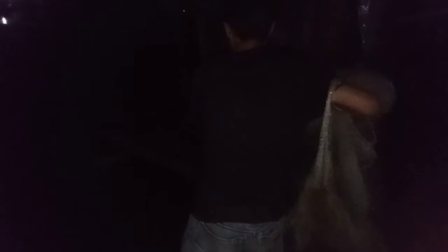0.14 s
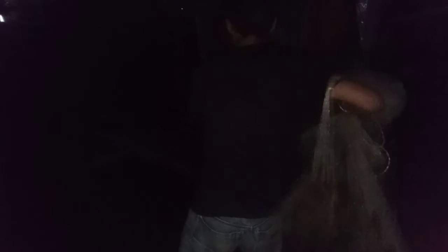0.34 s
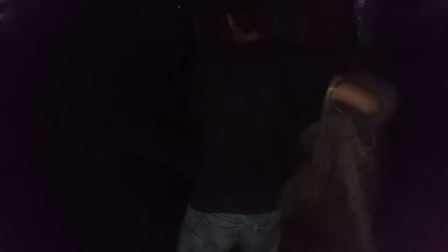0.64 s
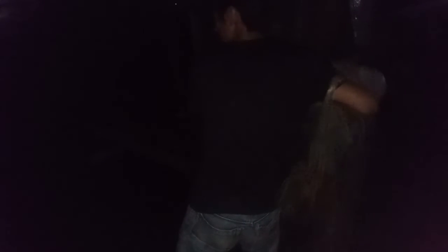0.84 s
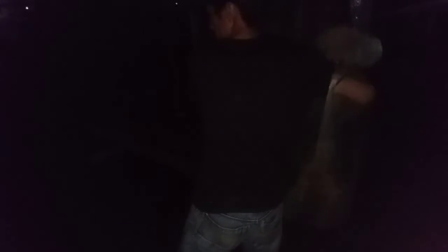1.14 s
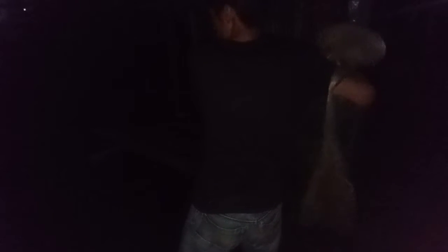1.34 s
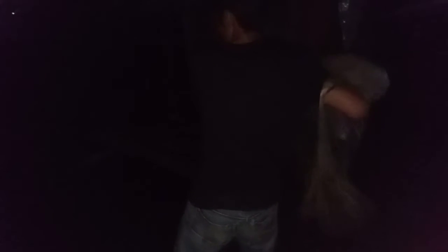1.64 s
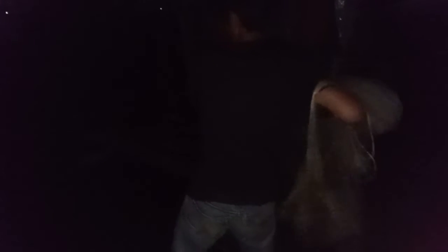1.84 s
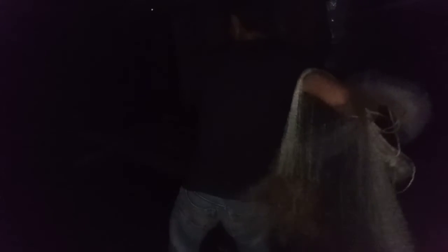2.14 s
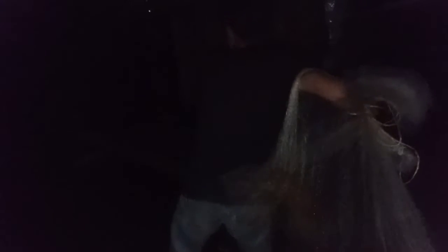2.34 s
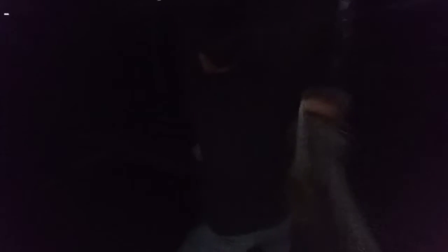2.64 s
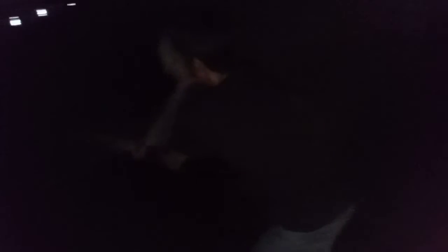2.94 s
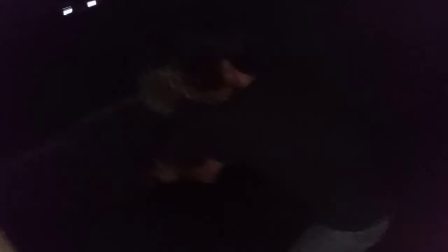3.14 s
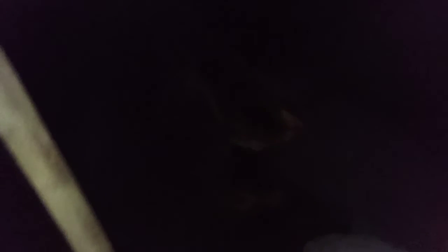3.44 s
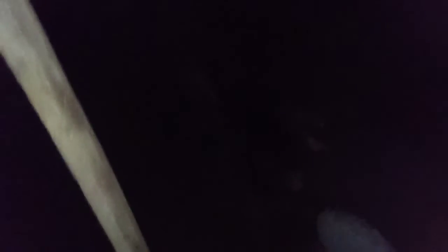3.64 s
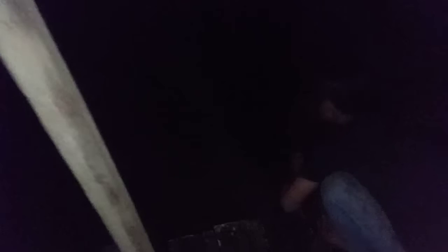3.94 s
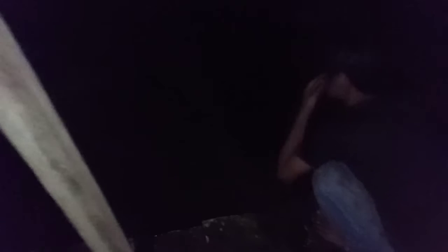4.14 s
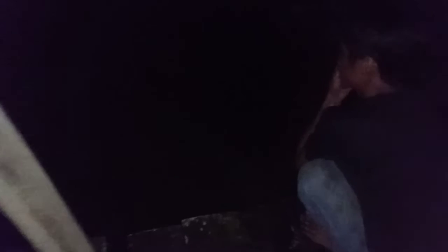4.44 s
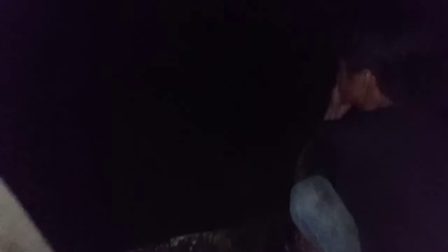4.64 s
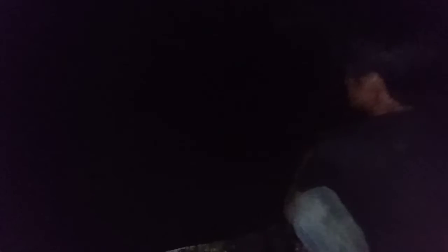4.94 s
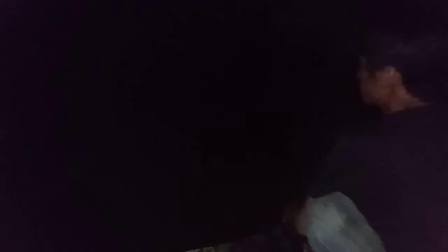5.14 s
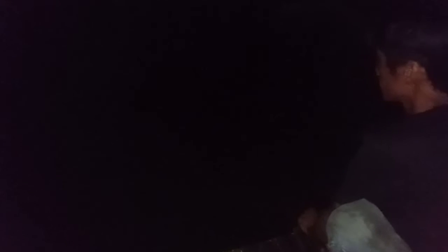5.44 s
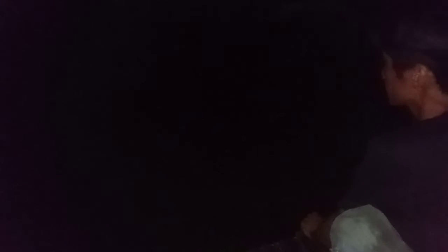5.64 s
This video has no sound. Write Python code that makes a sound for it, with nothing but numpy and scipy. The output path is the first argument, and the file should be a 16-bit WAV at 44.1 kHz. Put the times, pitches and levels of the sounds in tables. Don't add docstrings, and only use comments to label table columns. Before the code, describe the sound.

A quiet river at night, heard from a boat through a small microphone: soft hiss, a far engine's fluttering low hum and a cricket's high, pulsed chirps in quick groups of two to four, with some gaps. From 0 to 2.6 s, small sinker links clink irregularly, bright and thin, busiest in the first half second, with light mesh rustle. From 2.65 s the net swings and the rattle thickens. A faint line whistle at 3.0 s leads to a sharp snap at 3.1, then another rising whistle at 3.3. A foot slides and thumps hollowly at 3.5. At 3.8 the net meets the water: sharp slaps, dense bubbles and spray spread until 4.4, with loud plops near 3.9 and 4.3. The splash collapses fast into drips, then tiny droplet ticks to the end. The cricket is duller after 4.4; a faint, rough frog croaks at 5.45-5.75.

```python
import sys
import numpy as np
from scipy import signal
from scipy.fft import rfft, irfft
from scipy.io import wavfile
from scipy.ndimage import uniform_filter1d

SR = 44100
rng = np.random.default_rng(int(sys.argv[2]) if len(sys.argv) > 2 else 0)


def inscribe(sig):
    pcm = np.round(np.clip(np.atleast_2d(sig).T, -1, 1) * 32767)
    wavfile.write(sys.argv[1], SR, pcm.astype(np.int16))


def magnitude_from_level(level_db):
    exponent = np.asarray(level_db, float) / 20
    return 10 ** exponent


N = 254898

# (time [s], peak level [dB], high ring [Hz], high ring over the low [dB])
HANGING_KNOCKS = [(0.041, -49.5, 12300, 11.5), (0.0655, -55, 12700, 10), (0.1037, -43, 13000, 6),
                  (0.1238, -41.5, 12700, 13.5), (0.167, -39.5, 12200, 0), (0.214, -33.5, 12600, -2),
                  (0.2485, -40, 12100, 9.5), (0.309, -33.5, 12100, 6), (0.316, -27, 12300, 7),
                  (0.344, -39, 12600, 1), (0.375, -39.5, 12500, 0), (0.4339, -55, 12700, 15),
                  (0.461, -42.5, 12420, 7), (0.6456, -38.5, 12500, -14), (0.7645, -36, 12200, -15),
                  (0.8056, -46, 12180, 7), (0.9213, -49, 12700, -11), (1.1174, -52, 12300, 7),
                  (1.1973, -41, 12400, -2), (1.2645, -52.5, 12800, 16), (1.5878, -45, 11800, -4),
                  (1.649, -40.5, 12180, 2), (1.8398, -39, 11400, -13), (1.888, -34, 12300, -15),
                  (1.9909, -54, 12600, 0), (2.0637, -57, 12500, 12), (2.169, -38, 12740, 9.5),
                  (2.2, -42, 12670, 5), (2.2653, -45, 12300, -7), (2.3042, -56, 12600, 0),
                  (2.331, -56, 11900, 6), (2.402, -45, 12800, 5), (2.410, -43, 12800, -11),
                  (2.4355, -48, 11900, -2), (2.4455, -36.5, 12500, 8.5), (2.557, -55, 12200, 5),
                  (2.5853, -43, 13400, -6)]
# (time [s], level [dB])
NET_LANDING = [
    (3.795, -38.5),
    (3.81, -34.5),
    (3.843, -35.5),
    (3.847, -33),
    (3.918, -27),
    (3.962, -30.5),
    (4.058, -30),
    (4.064, -33),
    (4.424, -34),
]


def evened(x):
    return x / np.sqrt(np.mean(x ** 2) + 1e-20)


def settled(x, first):
    return x / np.std(x[first:])


def add(mix, s, sound):
    part = mix[round(s * SR):][:len(sound)]
    part += sound[:len(part)]


def curves(rows):
    s, *columns = np.transpose(rows)
    return [np.interp(np.arange(N) / SR, s, c, left=-90, right=-90) for c in columns]


def coloured(x, points, lo_hz=0, hi_hz=30000):
    hz = np.fft.rfftfreq(N, 1 / SR) + 1
    f, db = np.transpose(points)
    edges = 1 / np.sqrt((1 + (lo_hz / hz) ** 8) * (1 + (hz / hi_hz) ** 8))
    return irfft(rfft(x) * magnitude_from_level(np.interp(np.log(hz), np.log(f), db)) * edges, N)


def wander(per_s):
    noise = uniform_filter1d(rng.standard_normal(N), int(SR / per_s / 4) + 1)
    return evened(signal.lfilter([1], [1, -np.exp(-2 * np.pi * per_s / SR)], noise))


def clicks(per_s, spread_db):
    where, size, sign = rng.random((int(per_s * N / SR), 3)).T
    size_db = spread_db * np.minimum(-np.log(size + 1e-9), 5)
    return np.bincount((where * N).astype(int), magnitude_from_level(size_db) * np.sign(sign - .5), N)


def ring(hz, t60, glide=0.):
    t = np.arange(int(t60 * SR) + 8) / SR
    return magnitude_from_level(-60 * t / t60) * np.sin(2 * np.pi * hz * t * (1 + glide * t / t60))


def ramped(mode, rise_s):
    return mode * np.minimum(np.arange(len(mode)) / SR / rise_s, 1)


def fuzzy_tone(hz, fuzz):
    return (fuzz * np.exp(2j * np.pi * np.cumsum(hz) / SR)).real


def night():
    # (pitch [Hz], level [dB per Hz])
    night_colour = [(24, -51), (40, -34), (130, -8.5), (171, -9), (936, -28.5), (3110, -29.5), (4680, -39),
                    (5260, -30), (5670, -34), (6270, -28.5), (7470, -43), (8460, -33), (9590, -48),
                    (12300, -47), (15800, -54.5)]
    hiss = coloured(rng.standard_normal(N), night_colour, lo_hz=55.0)
    hiss /= np.std(coloured(hiss, [(1, 0), (2, 0)], 500, 4000))
    return magnitude_from_level(-61 + 0.5 * wander(0.67)) * hiss


def engine():
    # (time [s], main firing tone [dB], load [0-1])
    engine_run = [(0.0, -51, 0.14), (0.21, -50, 0.58), (0.4, -67, 0.42), (0.69, -49, 0.66),
                  (1.19, -49.5, 1.0), (1.5, -46.5, 0.7), (1.77, -45.5, 0.75), (1.95, -51.5, 0),
                  (2.11, -58, 0.4), (2.28, -50, 0.1), (3.35, -49, 0.39), (3.98, -46, 0.52),
                  (4.81, -46.5, 0), (5.78, -47, 0)]
    # (multiple of the shaft speed, level [dB])
    shaft_orders = [(3, -22), (7, -27), (8, -9), (9, 1), (10, -3), (12, -20), (13, -10), (14, -14),
                    (15, -19.5), (16, -14)]
    # (pitch [Hz], level [dB per Hz])
    rumble_colour = [(26, -36), (45, -2), (118, -2), (145, -4.5), (217, -6), (276, -8), (351, -11.5),
                     (700, -51), (910, -46), (1540, -120)]
    shaft_hz, pipe_lag_s, load_lift_db = 30.42, 0.27, 15.5
    t = np.arange(N) / SR
    line_db, load = curves(engine_run)
    late = np.interp(t - pipe_lag_s, t, load)
    orders_db = -61 + load_lift_db * load
    pipe_db = -56.5 + 7 * late
    shift_db = load_lift_db * (late - load)
    turns = 2 * np.pi * np.cumsum(shaft_hz * (1 + 0.0035 * wander(2.97))) / SR
    main = np.sqrt(2) * magnitude_from_level(line_db - .3 + 1.7 * wander(16)) * np.cos(4 * turns)
    pipe = magnitude_from_level(pipe_db + 1.5 * wander(6)) * (np.cos(5 * turns + 1) + .6 * np.cos(6 * turns + 3))
    orders = np.zeros(N)
    for k, db in shaft_orders:
        level = magnitude_from_level(db + shift_db * (k > 11) + 2.3 * wander(7.9))
        orders += level * np.cos(k * turns + 6 * rng.random())
    second_motor = np.sqrt(2) * magnitude_from_level(-60.5 + 0.62 * wander(3.7)) * np.cos(2 * np.pi * 69.5 * t)
    rumble = evened(coloured(rng.standard_normal(N), rumble_colour, lo_hz=59.5, hi_hz=900))
    return main + magnitude_from_level(-0.5) * pipe + magnitude_from_level(orders_db - 2.0) * orders + second_motor + magnitude_from_level(-55.5) * rumble


def strokes():
    # (start [s], level [dB])
    triples = [(0.0315, -54), (0.1965, -54), (0.371, -54), (0.8696, -54), (1.039, -55), (1.2, -55.5),
               (1.3596, -55.5), (1.52, -53.5), (1.689, -54), (1.8587, -55.5), (2.028, -52.5), (2.9196, -56),
               (3.2155, -53.5), (3.3859, -52.5), (3.5594, -50), (4.44, -57), (4.601, -57), (4.763, -58),
               (4.934, -55), (5.097, -55.5), (5.265, -58), (5.429, -59)]
    # (start [s], level [dB])
    doubles = [(2.4235, -53), (2.537, -52.5), (2.6665, -52), (2.7833, -53), (3.0827, -55), (3.7458, -55),
               (5.615, -58.5), (5.733, -58.5)]
    # (start [s], level [dB])
    slow_runs = [
        (0.557, -53),
        (2.1766, -49.5),
    ]
    # (start [s], level [dB])
    lone = [
        (0.8125, -53),
        (5.53, -69),
    ]
    gap_s, last_gap_s, slow_gap_s, second_db = .0325, .0388, .065, 0.5
    kinds = [(triples, [0, gap_s, gap_s + last_gap_s], [0, second_db, 0]),
             (doubles, [0, gap_s], [0, second_db]),
             (lone, [0], [0]),
             (slow_runs, slow_gap_s * np.arange(4), np.zeros(4))]
    return [(s + late, db + step) for rows, lates, steps in kinds
            for s, db in rows for late, step in zip(lates, steps)]


def cricket():
    turned_s = 4.4
    t, out = np.arange(int(.033 * SR)) / SR, np.zeros(N)
    shape = np.minimum(t / .006, 1) * np.minimum((t[-1] - t) / .004, 1)
    all_strokes = strokes()
    for (s, db), (a, b, c) in zip(all_strokes, rng.standard_normal((len(all_strokes), 3))):
        turned = s > turned_s
        fall_hz = (570 - 90 * turned) * (t / t[-1]) ** (2.5 + .3 * c)
        hz = (5420 - 70 * turned - fall_hz) * (1 + .003 * a)
        level = magnitude_from_level(db + 5.0 - 330 * t + 0.64 * c)
        add(out, s - .0035, level * shape * np.sin(2 * np.pi * np.cumsum(hz) / SR + 3 * b))
    echo = np.zeros(int(.0068 * SR) + 1)
    echo[0], echo[-1] = 1, .35
    bank = np.arange(int(.12 * SR)) / SR
    reeds = rng.standard_normal(len(bank)) * magnitude_from_level(-60 * bank / .25) * (bank > .01)
    scattered = out * magnitude_from_level(np.where(np.arange(N) / SR > turned_s, -28.5, -34.5))
    return signal.oaconvolve(out, echo)[:N] + signal.oaconvolve(scattered, reeds)[:N]


def chain_knocks():
    # (time [s], peak level [dB], high ring [Hz], high ring over the low [dB])
    swung_knocks = [(2.633, -32.5, 12000, -7), (2.6738, -35, 12600, 0), (2.7071, -44, 11960, 14),
                    (2.7541, -40, 11900, 2), (2.8092, -37.5, 12600, 4), (2.8534, -38.5, 11900, 2),
                    (2.9148, -35, 11800, 3.5), (2.9535, -35, 12400, 5), (3.0947, -38, 12000, 11),
                    (3.169, -33, 11400, -1), (3.275, -33, 12300, -6), (3.561, -33, 12400, -6),
                    (3.576, -33, 12200, -3), (3.614, -34, 12600, 1), (3.6895, -29.5, 12000, -6)]
    # (time [s], peak level [dB], high ring [Hz], high
    # ring over the low [dB])
    low_knocks = [
        (3.190, -31, 11600, -8),
        (3.238, -37, 11700, -6),
        (3.629, -31, 11900, -5),
        (3.653, -33, 11800, -7),
        (3.677, -36, 11900, -8),
        (3.722, -37, 11800, -6),
        (3.750, -36, 12000, -6),
    ]
    kinds = [(8420, HANGING_KNOCKS), (8160, swung_knocks), (7850, low_knocks)]
    knocks = [(low_hz, *row) for low_hz, rows in kinds for row in rows]
    out, rise_s = np.zeros(N), 0.00071
    for (low_hz, s, db, high_hz, high_db), chance in zip(knocks, rng.uniform(-1.3, 1, (len(knocks), 4, 3))):
        low_hz *= 1 + 0.0128 * chance[0, 1]
        for k, (late, size, loud) in enumerate(chance):
            at = s + 0.006 * k * (1 + 0.31 * late)
            hit_db = db - 5.4 * k + 2.4 * loud * (k > 0)
            low = ramped(ring(low_hz * (1 + 0.0044 * k * size), 0.074), rise_s)
            high = ramped(ring(high_hz * (1 + 0.0128 * k * size), 0.07), rise_s)
            add(out, at, magnitude_from_level(hit_db - 12.0) * low)
            add(out, at, magnitude_from_level(hit_db - 14.5 + high_db) * high)
            add(out, at, magnitude_from_level(hit_db - 24.5 - .5 * high_db) * ring(low_hz * (.42 + .06 * size), 0.023))
            add(out, at, magnitude_from_level(hit_db - 16) * ring(11000 * (1 + 0.22 * size), .0015))
    return out


def shaking():
    # (time [s], rattle level [dB])
    swing = [
        (1.5, -77.5),
        (1.65, -62.5),
        (1.8, -72),
        (2.5, -82.5),
        (2.68, -56),
        (3.15, -53),
        (3.22, -47.5),
        (3.52, -53.5),
        (3.8, -53),
    ]
    t = np.arange(N) / SR
    swing_db = curves(swing)[0]
    links, mesh = magnitude_from_level(swing_db), np.zeros(N)
    for s, db, _, high_db in HANGING_KNOCKS:
        at = slice(round((s - .03) * SR), round((s + .25) * SR))
        u = t[at] - s
        fade = magnitude_from_level(db - 20 - 319 * np.maximum(u, 0))
        shiver = fade * np.exp(np.minimum(u, 0) / 0.0029)
        links[at] += shiver
        mesh[at] += shiver * magnitude_from_level(-15 + 0.67 * high_db)
    return links, mesh, magnitude_from_level(swing_db - 14.5)


def chain_rattle():
    # (pitch [Hz], level [dB])
    mesh_colour = [(1500, 0), (2200, 4), (3800, -1.5), (4600, -35), (6000, 3.5), (8300, 5.5), (10200, -7.5),
                   (12200, 5.5), (13800, -1), (15500, -2.5)]
    rattle, shiver, rustle = shaking()
    links, link_t60 = np.zeros(N), 0.06
    for size, other in zip(np.linspace(-1, 1, 16), rng.permutation(np.linspace(-1, 1, 16))):
        link = ring(8150 * (1 + 0.044 * size), link_t60)
        link = link + magnitude_from_level(-8.5) * np.resize(ring(3800 * (1 + 0.0675 * size), link_t60), len(link))
        link = link + magnitude_from_level(-5.5) * np.resize(ring(12200 * (1 + 0.0487 * other), link_t60), len(link))
        links += signal.oaconvolve(clicks(75, 3.76) * rattle, link / 12)[:N]
    mesh = evened(coloured(clicks(3500, 2.1), mesh_colour, lo_hz=1190))
    bright_mesh = coloured(mesh, [(1, 0), (2, 0)], lo_hz=4340)
    return magnitude_from_level(6.0) * links + magnitude_from_level(2.0 * wander(60) + 11.5) * (rustle * mesh + shiver * bright_mesh)


def tinkle():
    t, out = np.arange(N) / SR, np.zeros(N)
    for hz in np.linspace(11500, 13400, 8):
        ping = ring(hz, .03)
        ping *= np.minimum(np.arange(len(ping)) / 50, 1)
        out += signal.oaconvolve(clicks(6, 2.8) * (t < 3.79), ping)[:N]
    return magnitude_from_level(-70) * out


def hand_line():
    # (time [s], level [dB], pitch [Hz])
    line_runs = [
        [(2.955, -78, 2090), (2.98, -63, 2110), (3.03, -67.5, 2130), (3.06, -78, 2280)],
        [(3.295, -78, 1870), (3.31, -65, 1930), (3.364, -62, 2170), (3.41, -76, 2200)],
    ]
    fuzz = wander(30) + 1j * wander(30)
    return sum(magnitude_from_level(db) * fuzzy_tone(hz, fuzz) for db, hz in map(curves, line_runs))


def line_snap():
    # (pitch [Hz], level [dB], time to die by 60 dB [s])
    snap_rings = [(2250, -27, .014), (2700, -34, .008), (3100, -26, .016), (3650, -30, .008),
                  (6000, -38, .01), (1750, -34, .01)]
    out, snap_s = np.zeros(N), 3.10713
    u = np.arange(-80, 80) / SR
    crack = np.exp(-(u / .00029) ** 2) * np.sin(2 * np.pi * 2850 * u)
    add(out, snap_s - 80 / SR, magnitude_from_level(-13) * crack)
    for hz, db, t60 in snap_rings:
        add(out, snap_s, magnitude_from_level(db) * ramped(ring(hz, t60), .0006))
    return out


def drops():
    # (time [s], peak level [dB], pitch [Hz], length [cycles])
    main_drops = [(3.916, -13.5, 2110, 4.8), (4.1106, -20, 6800, 9), (4.162, -19, 7000, 6.7),
                  (4.207, -20, 2040, 6), (4.236, -17.5, 6900, 4.7), (4.234, -36.5, 335.7, 4.9),
                  (4.2969, -12, 1370, 3.1), (4.3013, -19, 2400, 2.6), (4.305, -16.5, 2160, 4),
                  (4.399, -16.5, 900, 1.6), (4.4185, -20.5, 4680, 5.1), (4.427, -31.5, 5900, 23),
                  (4.455, -26, 8000, 5), (4.695, -38.5, 6800, 9.1), (4.727, -34.5, 2560, 3.8),
                  (4.734, -38.5, 760, 4), (4.77, -36.5, 2500, 4.8), (4.788, -37, 3280, 7),
                  (4.82, -44, 2350, 5.1), (4.878, -37, 2860, 2.2), (5.105, -37, 2260, 1.7),
                  (5.231, -43, 6250, 6.1), (5.244, -45, 2600, 3.1), (5.4, -45.5, 1900, 3.8),
                  (5.619, -48, 1440, 4.5)]
    # (time [s], peak level [dB], pitch [Hz], length [cycles])
    more_drops = [(3.116, -44.5, 1010, 4), (4.2268, -23, 6980, 4), (4.209, -28, 13800, 6),
                  (4.3086, -21, 6210, 4), (4.354, -24, 5080, 4.4), (4.367, -30, 13500, 5),
                  (4.413, -27, 12520, 5), (4.47, -34, 2300, 8), (4.484, -35, 2300, 8),
                  (4.512, -33, 1850, 4), (4.532, -37, 7000, 5), (4.557, -33, 5250, 5),
                  (4.573, -39, 5500, 3), (4.581, -37, 2080, 4), (4.591, -35, 2320, 6.3),
                  (4.5975, -37, 5860, 5), (4.6109, -37, 7000, 4), (4.6563, -39, 8400, 5),
                  (4.801, -45, 6910, 5)]
    out = np.zeros(N)
    for s, db, hz, cycles in main_drops + more_drops:
        bubble = ring(hz, 4 * max(cycles, 1) / hz, glide=.1)
        add(out, s, magnitude_from_level(db + 4) * ramped(bubble, 1.2 / hz))
    return out


def footfall():
    # (time [s], level [dB], start pitch [Hz], end pitch [Hz], time to die by 60 dB [s])
    thumps = [
        (3.513, -26, 243, 187, 0.11),
        (3.533, -33.5, 105, 102, 0.17),
    ]
    # (time [s], level [dB])
    scuff = [
        (3.42, -66),
        (3.47, -55.5),
        (3.53, -53),
        (3.6, -55),
        (3.72, -67),
    ]
    out = np.zeros(N)
    for s, db, start_hz, end_hz, t60 in thumps:
        add(out, s, magnitude_from_level(db) * ramped(ring(start_hz, t60, glide=end_hz / start_hz - 1), 0.0034))
    grit = coloured(clicks(1500, 2.3), [(500, 5.0), (1300, -5.5), (2800, -0.5)], 300, 2640)
    return out + magnitude_from_level(curves(scuff)[0]) * evened(grit)


def water_levels():
    # (while landing [dB], change [dB per s], while settling [dB],
    # last fizz [dB], fade of the fizz [dB per s])
    gurgle = (-17.5, 16.5, -6, -79, -4)
    body = (0, 0.5, 0.5, -79.5, 15)
    spray = (-9, -3, -21, -57.5, 9.5)
    mist = (-12.5, -8.5, -24, -61.5, 13)
    # (start level [dB], fall [dB per s])
    settle = [(-43.5, 72), (-44, 40)]
    # (time [s], lift [dB], fall [s])
    spray_sheets = [
        (3.797, 12.5, 0.045),
        (3.845, 11.5, 0.045),
        (3.875, 2, 0.014),
    ]
    t, start, end = np.arange(N) / SR, NET_LANDING[0][0], NET_LANDING[-1][0]
    settling = sum(magnitude_from_level(db - fall * np.maximum(t - end, 0)) for db, fall in settle)
    plunge = 9.3 * np.clip((t - 3.846) / 0.022, 0, 1) * (t < 4.113) - 25 * (t < 3.842)
    sheets = sum(db * np.exp(-np.maximum(t - s, 0) / fall) * (t > s) for s, db, fall in spray_sheets)
    landing_db = curves(NET_LANDING)[0]
    levels = []
    for part, lift in [(gurgle, plunge), (body, 0), (spray, sheets), (mist, 0.22 * sheets)]:
        share, change, late, fizz, fade = part
        landing_part = landing_db + share + change * (t - start) + lift
        settling_part = 20 * np.log10(settling * magnitude_from_level(late) + magnitude_from_level(fizz - fade * (t - end)))
        levels.append(np.where(t < end, landing_part, settling_part))
    return levels


def patchy(x, spread_db):
    z = signal.stft(x, nperseg=512)[2]
    field = uniform_filter1d(rng.standard_normal(z.shape), size=6, axis=0)
    field = uniform_filter1d(field, size=4, axis=1)
    spread_db = spread_db + .5 * (np.arange(z.shape[1]) * 256 / SR > NET_LANDING[-1][0])
    gain = magnitude_from_level(spread_db * evened(field) - .1 * spread_db ** 2)
    return signal.istft(z * gain, nperseg=512)[1][:N]


def splash():
    # (pitch [Hz], level [dB per Hz])
    water_colour = [(150, -27), (250, -7.5), (393, -6), (501, 0.5), (638, 2.5), (887, -4.5), (1070, -1),
                    (1210, -8), (1600, -4.5), (2190, 0), (3300, -7.5), (4900, -15.5), (7300, -5.5),
                    (10400, -21.5), (12000, -20.5), (15000, -17.5), (15800, -16.5)]
    # (time [s], lift [dB], lift of the mist [dB], rise [s], fall [s])
    slaps = [
        (3.850, 6, -5, 0.0015, 0.0054),
        (3.885, 2, 1, 0.018, 0.0059),
        (3.917, 0.5, -6, 0.003, 0.013),
        (4.0, 1.5, 6, 0.016, 0.01),
        (4.048, 3, 16, 0.02, 0.012),
        (4.135, 2.5, -1.5, 0.011, 0.0066),
        (4.24, 2.5, -4, 0.016, 0.011),
        (4.306, 1.5, 0, 0.0027, 0.0059),
    ]
    gurgle_db, body_db, spray_db, mist_db = water_levels()
    t, slap_db = np.arange(N) / SR, np.zeros(N)
    sheets_db = spray_db - body_db + 9
    top_db = mist_db + 0.26 * sheets_db * (t < 3.9)
    for s, lift_db, mist_lift_db, rise, fall in slaps:
        bump = np.exp(-((t - s) / np.where(t < s, rise, fall)) ** 2)
        slap_db = slap_db + lift_db * bump
        mist_db = mist_db + mist_lift_db * bump
        top_db = top_db + .6 * mist_lift_db * bump
    body_db = body_db - 3 * np.clip((t - 4.75) / .02, 0, 1)
    bubbles, first = np.zeros(N), int(NET_LANDING[0][0] * SR) - 2000
    for hz in np.geomspace(420, 14000, 30):
        bubble = ramped(ring(hz, 18 / hz, glide=0.14), 1.75 / hz)
        train = clicks(110 + hz / 15, 2.5)
        bubbles[first:] += evened(signal.oaconvolve(train[first:], bubble)[:N - first]) * np.sqrt(hz)
    water = patchy(.8 * bubbles / np.std(bubbles[first:]) + .6 * rng.standard_normal(N), 1.6)
    bands = [(0, 1300, gurgle_db), (1300, 4600, body_db), (4600, 9400, spray_db),
             (9400, 13000, mist_db), (13000, 30000, top_db - 4.5)]
    out = np.zeros(N)
    for lo, hi, db in bands:
        band = settled(coloured(water, water_colour, lo, hi), first)
        if lo == 9400:
            band = band / 1.4
        out += magnitude_from_level(slap_db + db + 0.86 * wander(25)) * band
    return out


def drips():
    t, out = np.arange(N) / SR, np.zeros(N)
    for hz in np.geomspace(500, 14500, 16):
        drop = ramped(ring(hz, .0012 + 8 / hz, glide=.1), 0.77 / hz)
        late_fade = 60 if hz < 6000 else 9
        fade_db = -38 - np.minimum(t - 4.42, 18 / 45) * 45 - late_fade * np.maximum(t - 4.85, 0)
        out += signal.oaconvolve(clicks(9 + hz / 500, 3.6) * magnitude_from_level(fade_db) * (t > 4.45), drop)[:N]
    return out


def late_ticks():
    # (time [s], peak level [dB], pitch [Hz])
    droplet_ticks = [(4.8308, -44, 9200), (4.9435, -48, 9040), (4.9482, -45, 7150), (5.0133, -40, 14800),
                     (5.0135, -43, 7200), (5.144, -53, 9940), (5.159, -52, 12500), (5.182, -48, 9800),
                     (5.189, -51, 13800), (5.2299, -54, 13900), (5.2538, -57, 9050), (5.2585, -45, 7300),
                     (5.2952, -51, 10200), (5.3401, -54, 13800), (5.3645, -52, 12000), (5.372, -53, 10500),
                     (5.391, -52, 10000), (5.3995, -53, 11000), (5.4259, -52, 13700), (5.4823, -54, 12000),
                     (5.5107, -55, 13000), (5.5342, -53, 11600), (5.541, -54, 11500), (5.5486, -50, 14300),
                     (5.554, -52, 11500), (5.585, -49, 13000), (5.596, -54, 10300), (5.6334, -53, 9700),
                     (5.6725, -51, 7140), (5.6963, -57, 11900), (5.721, -55, 12500), (5.7302, -48, 12600),
                     (5.7314, -51, 7500)]
    out = np.zeros(N)
    for s, db, hz in droplet_ticks:
        tick = ring(hz, .003)
        add(out, s, magnitude_from_level(db + 6.5) * tick * np.minimum(np.arange(len(tick)) / 9, 1))
    return out


def frog():
    # (time [s], level [dB], pitch [Hz])
    croak = [
        (5.44, -79, 1790),
        (5.486, -65.5, 1740),
        (5.678, -64, 1770),
        (5.76, -68, 1746),
    ]
    frog_db, frog_hz = curves(croak)
    throat = wander(56) + 1j * wander(60)
    return magnitude_from_level(frog_db) * fuzzy_tone(frog_hz, throat)


def scene():
    wet = line_snap() + drops() + footfall() + splash() + drips() + late_ticks() + frog()
    t = np.arange(int(.2 * SR)) / SR
    bank = rng.standard_normal(len(t)) * magnitude_from_level(-60 * t / 0.24) * (t > .004)
    wet = wet + magnitude_from_level(-24.0) * signal.oaconvolve(wet, bank / np.linalg.norm(bank))[:N]
    chain = chain_knocks() + chain_rattle() + tinkle()
    return (night() + engine() + cricket() + chain + hand_line() + wet)[None]


def roll_off(x):
    return signal.sosfilt(signal.butter(12, 15970, fs=SR, output="sos"), x)


def record(dry):
    edge = signal.firwin(1001, 15490, window=("kaiser", 9), fs=SR)
    port = signal.sosfilt(signal.butter(2, 48, "high", fs=SR, output="sos"), dry)
    held = .33 * np.tanh(port / .33)
    mix = signal.oaconvolve(held, edge[None], "same")
    return roll_off(mix)


dry = scene()
out = record(dry)
inscribe(out)
```